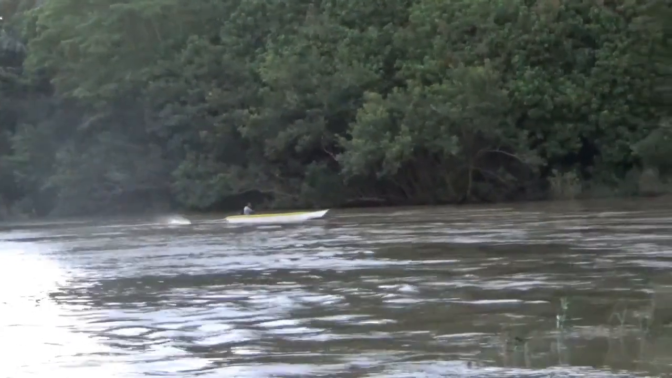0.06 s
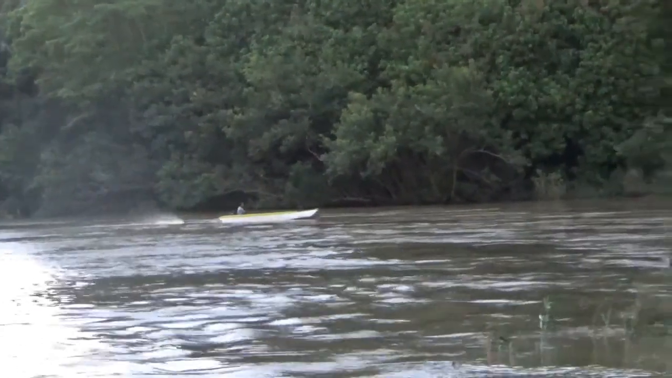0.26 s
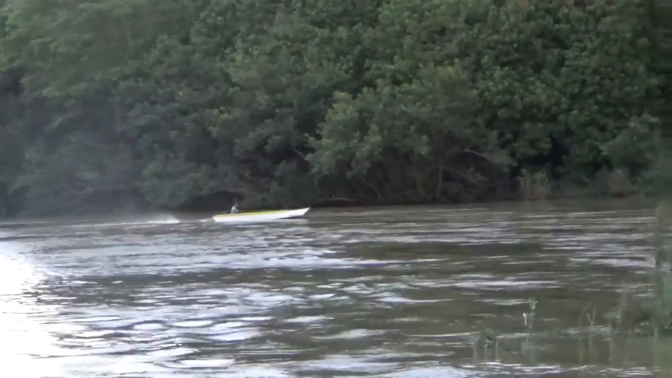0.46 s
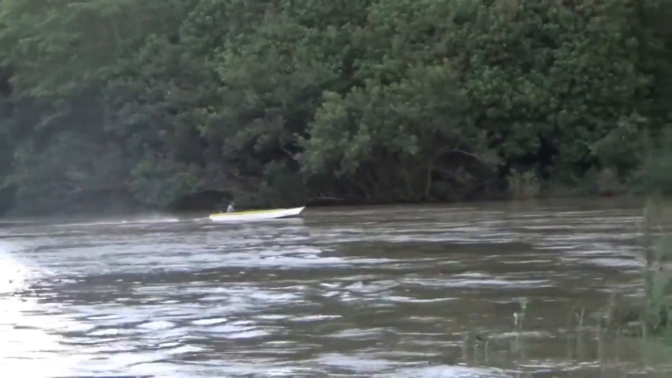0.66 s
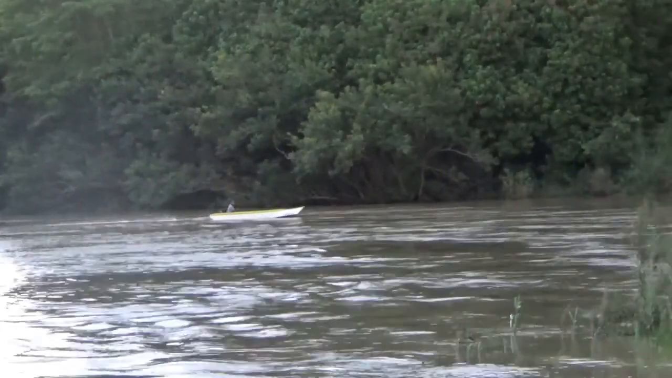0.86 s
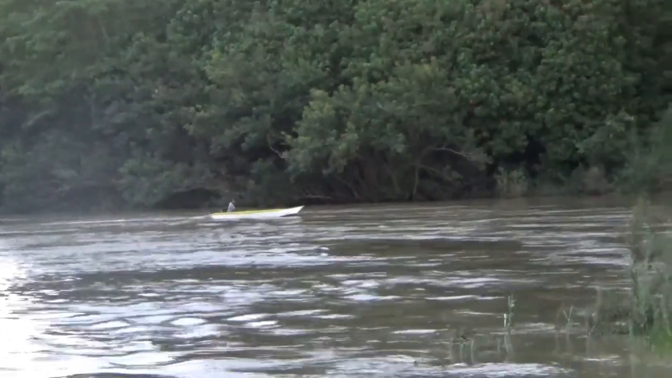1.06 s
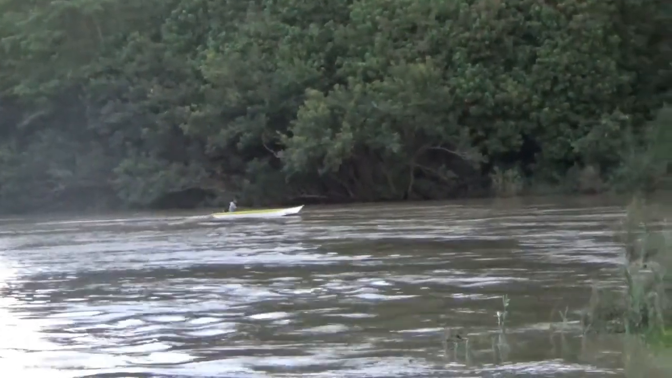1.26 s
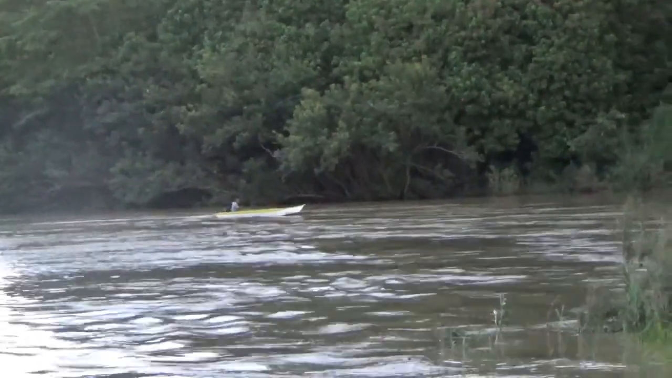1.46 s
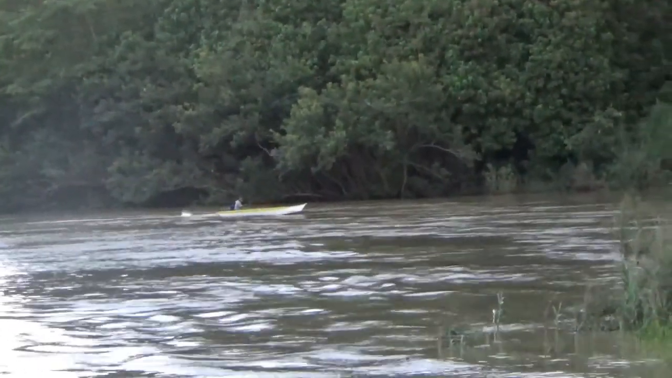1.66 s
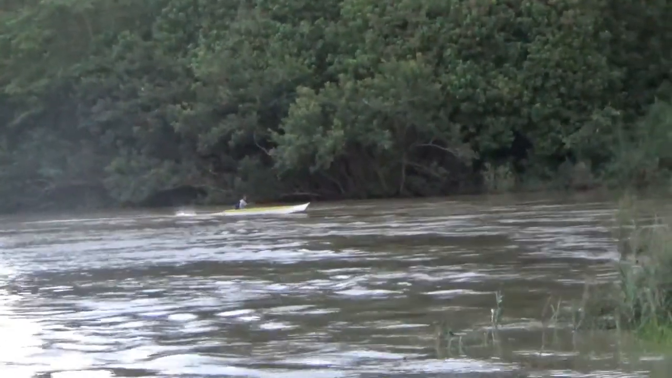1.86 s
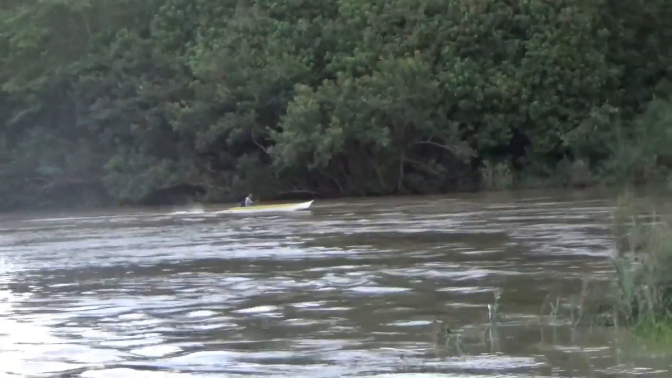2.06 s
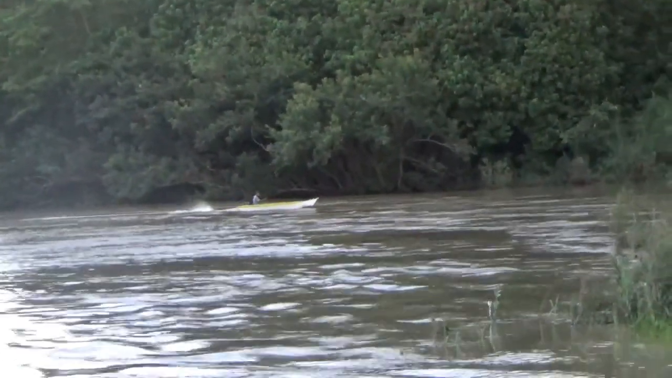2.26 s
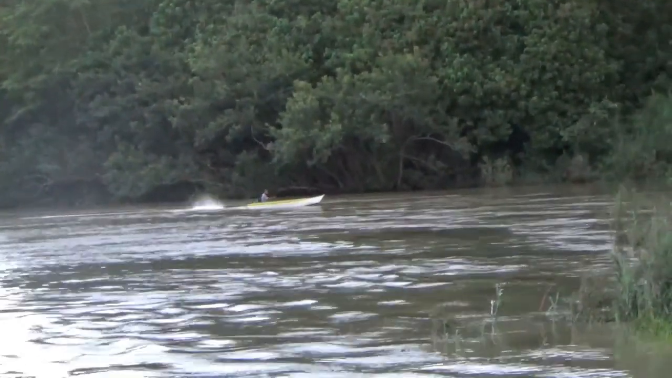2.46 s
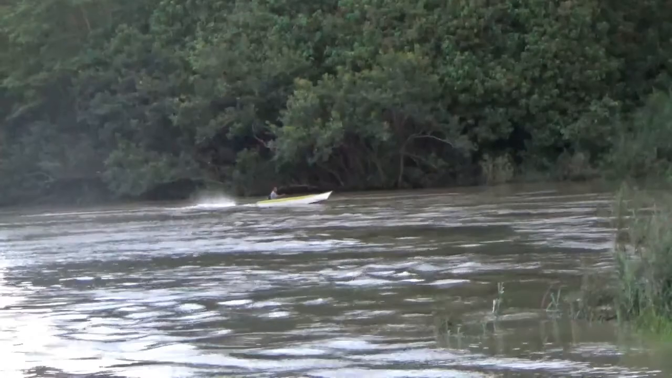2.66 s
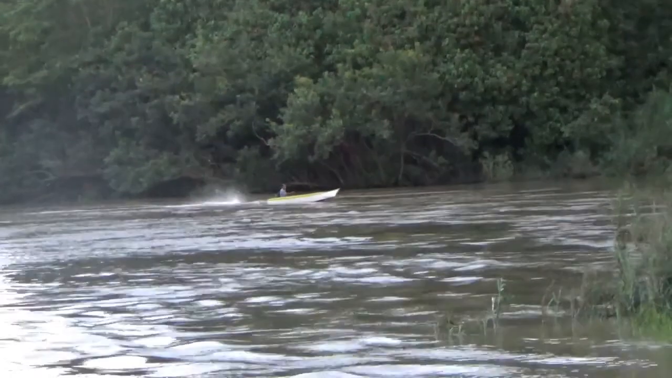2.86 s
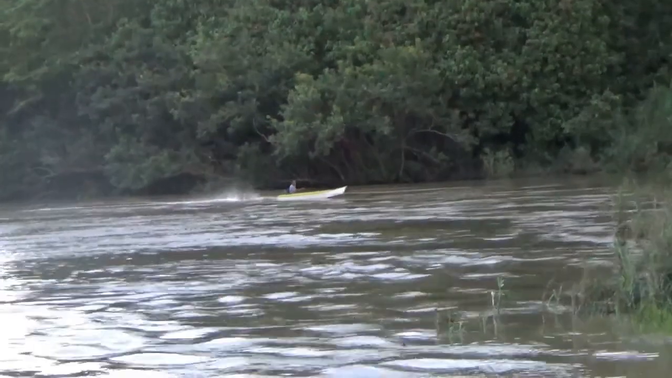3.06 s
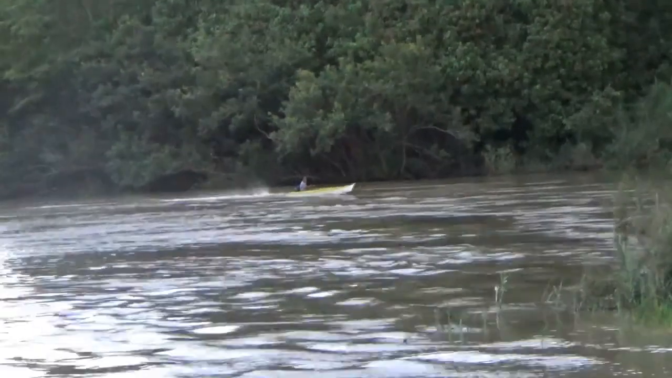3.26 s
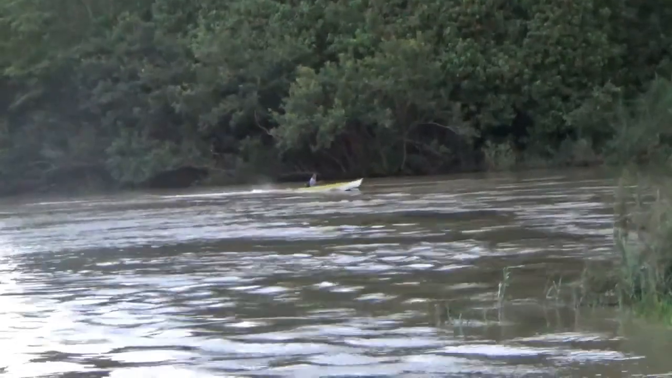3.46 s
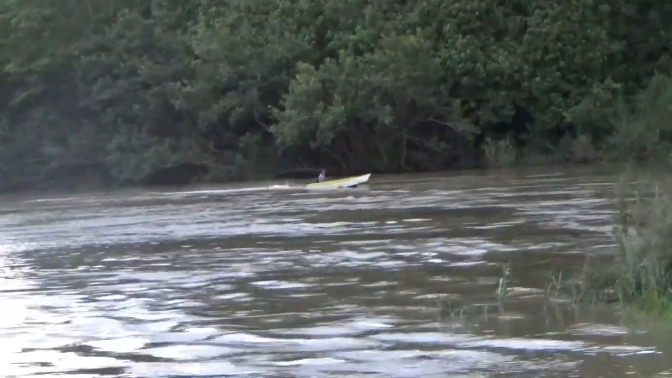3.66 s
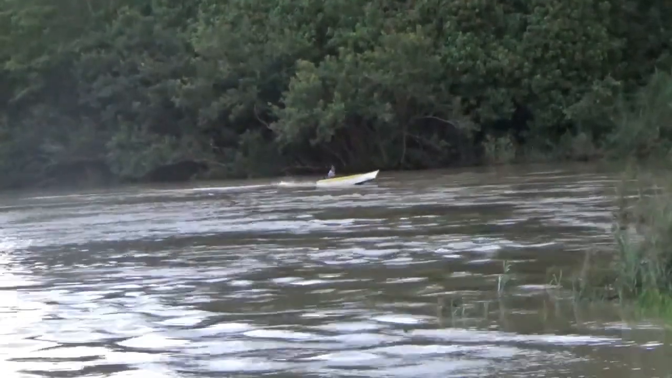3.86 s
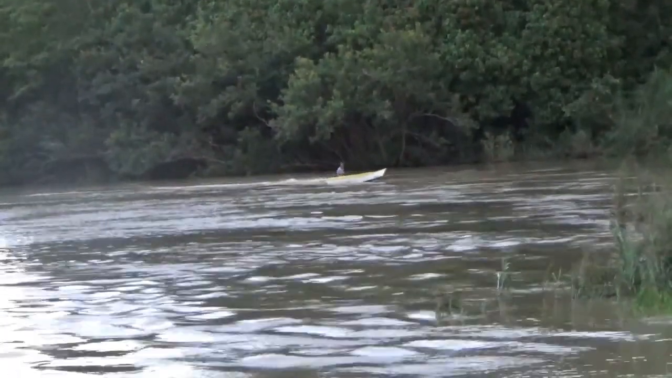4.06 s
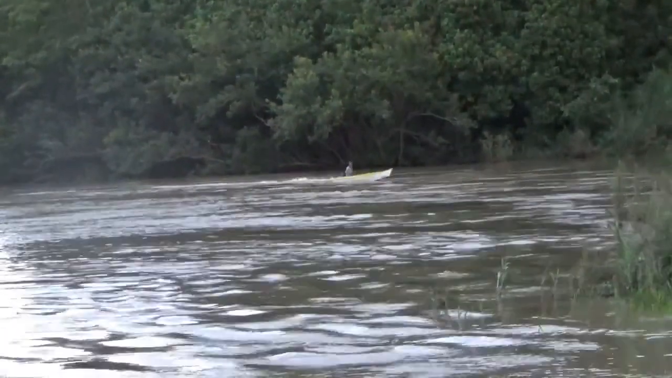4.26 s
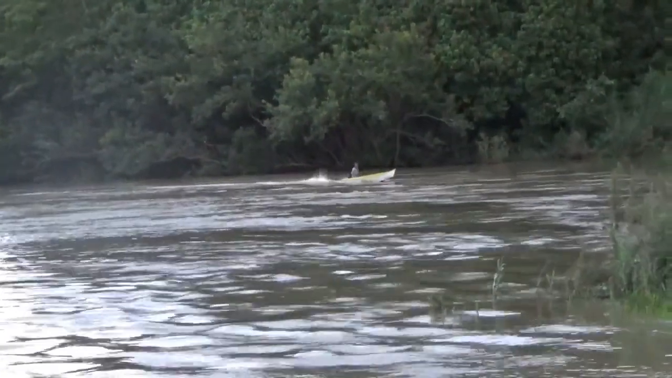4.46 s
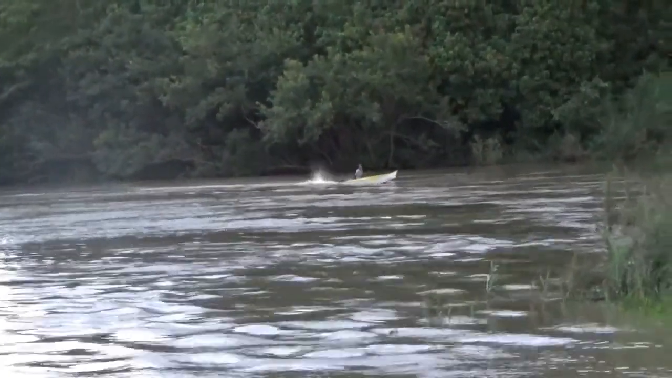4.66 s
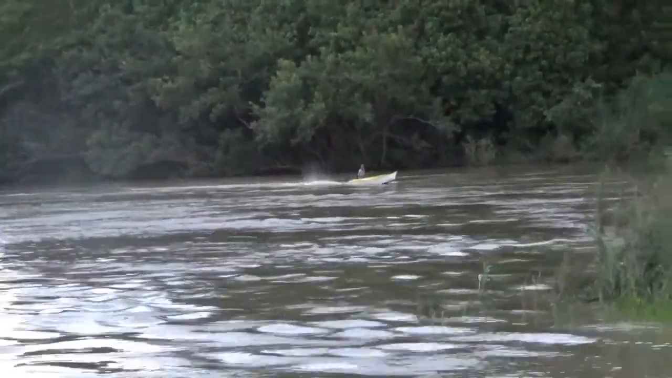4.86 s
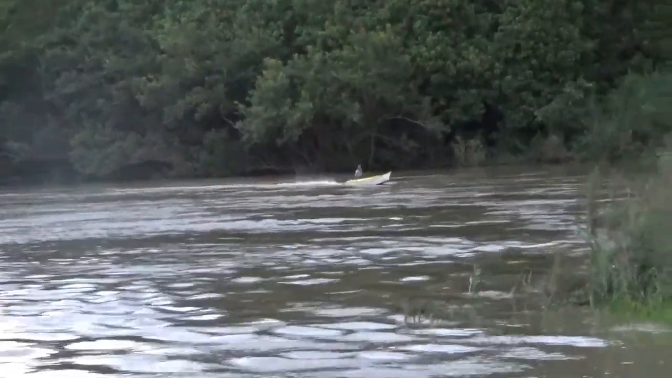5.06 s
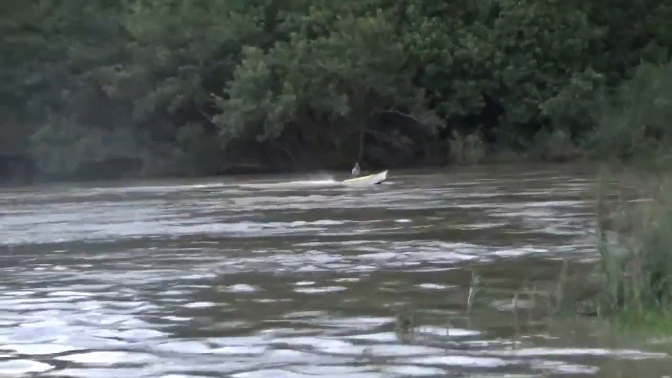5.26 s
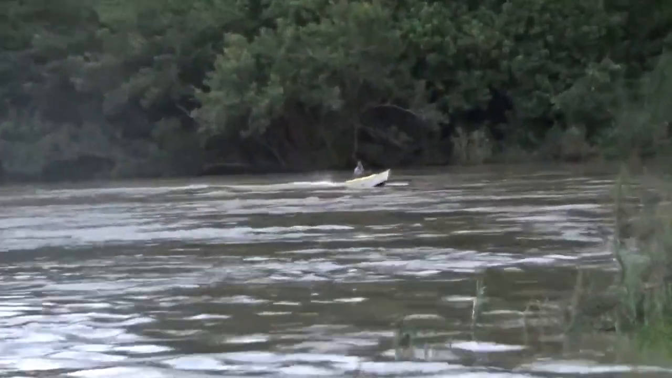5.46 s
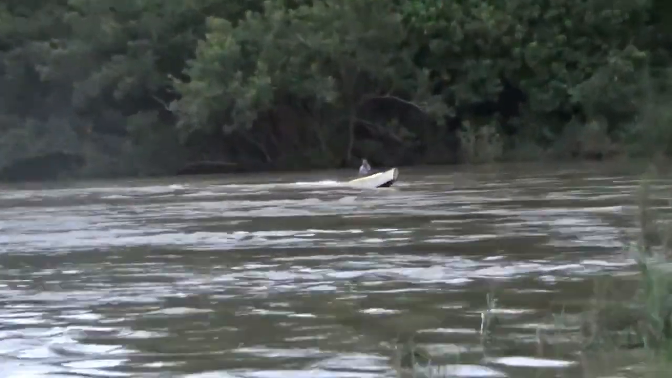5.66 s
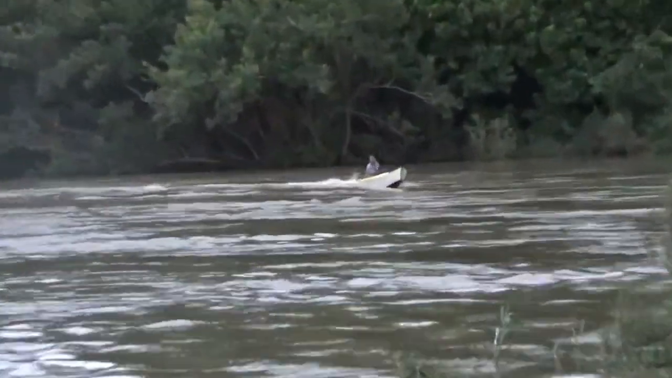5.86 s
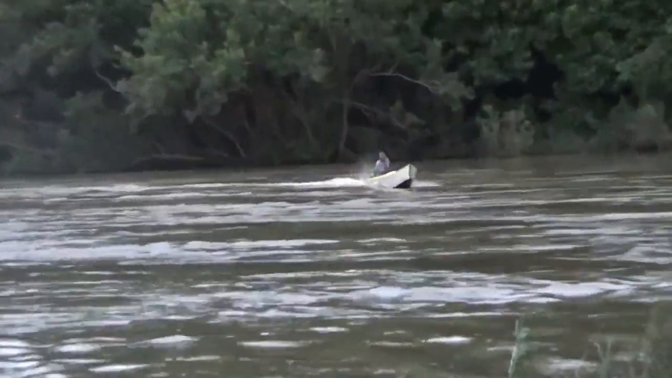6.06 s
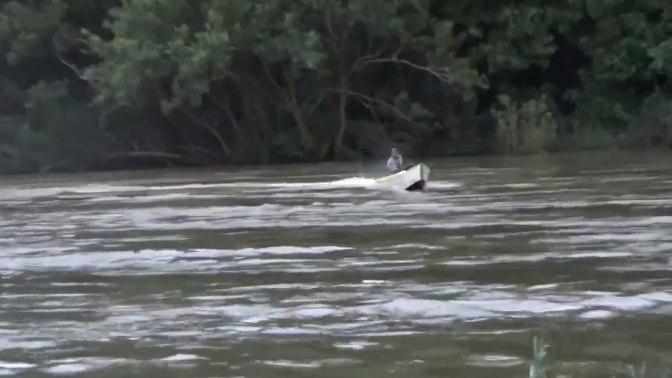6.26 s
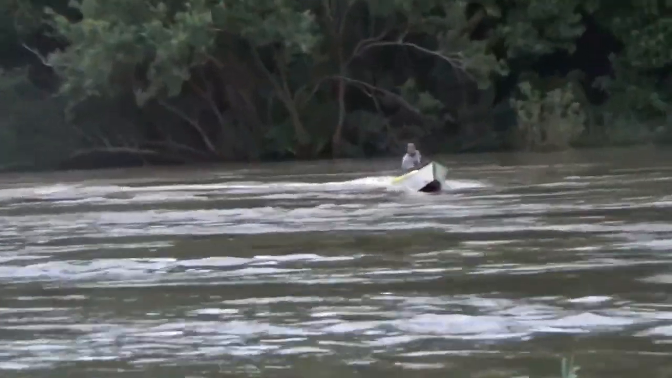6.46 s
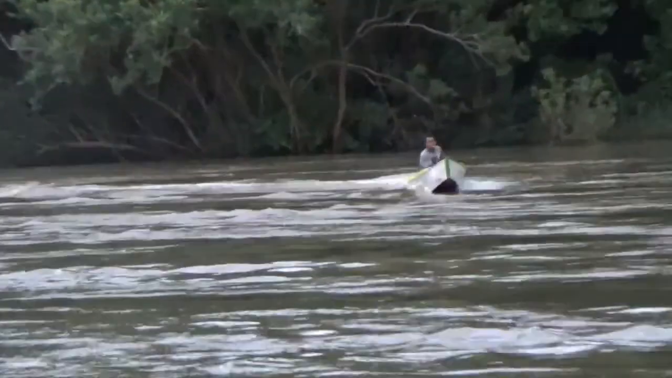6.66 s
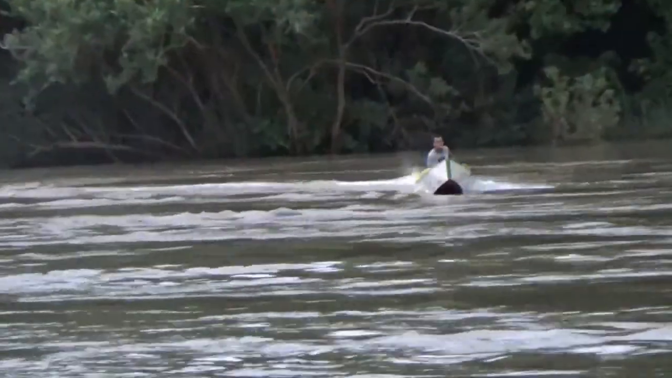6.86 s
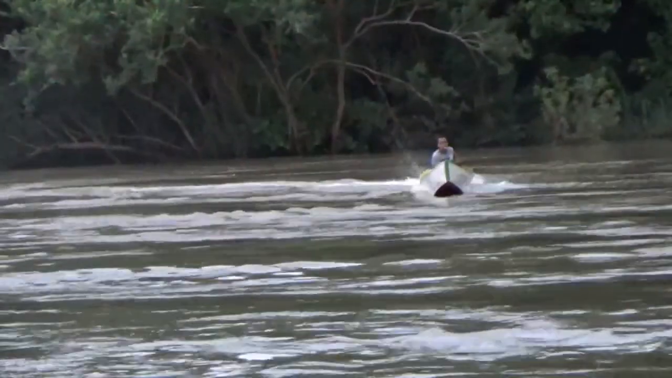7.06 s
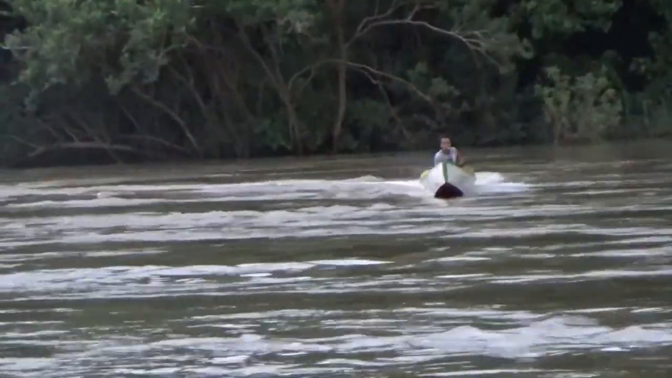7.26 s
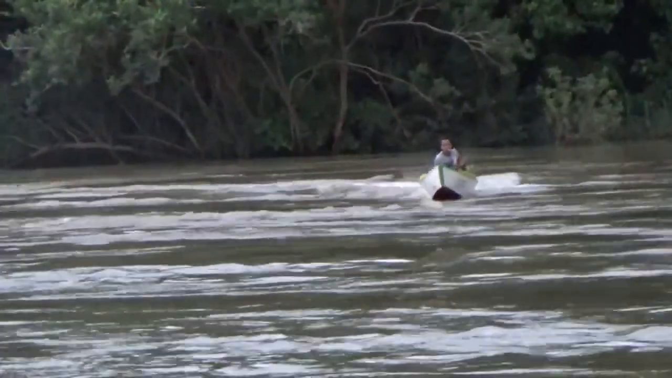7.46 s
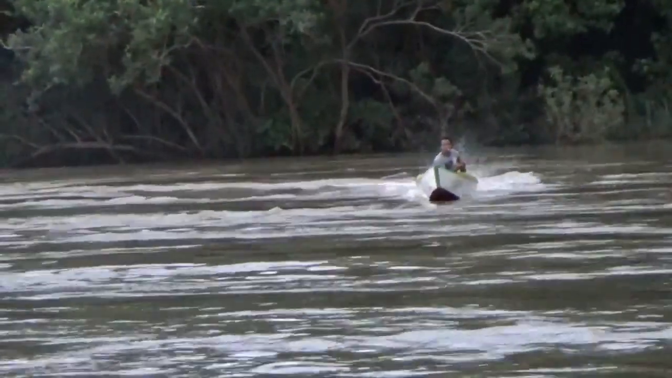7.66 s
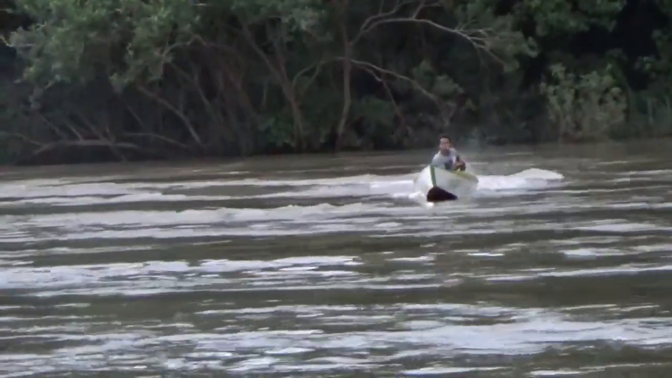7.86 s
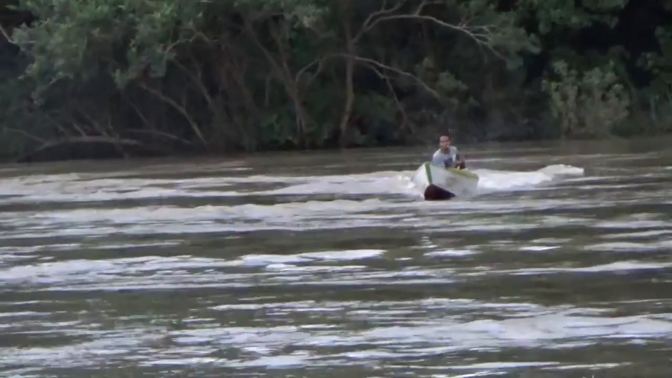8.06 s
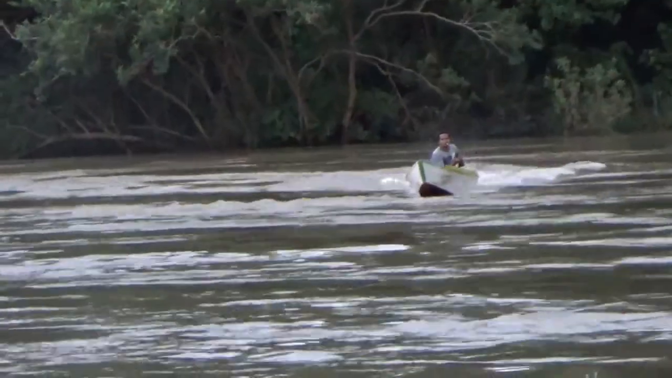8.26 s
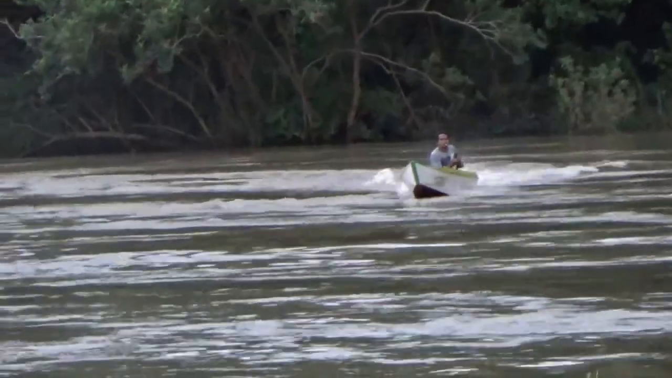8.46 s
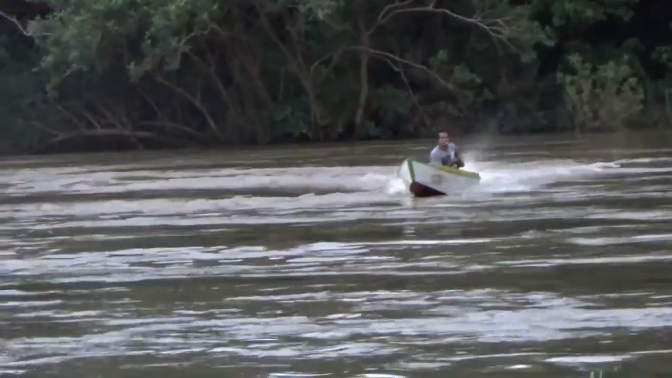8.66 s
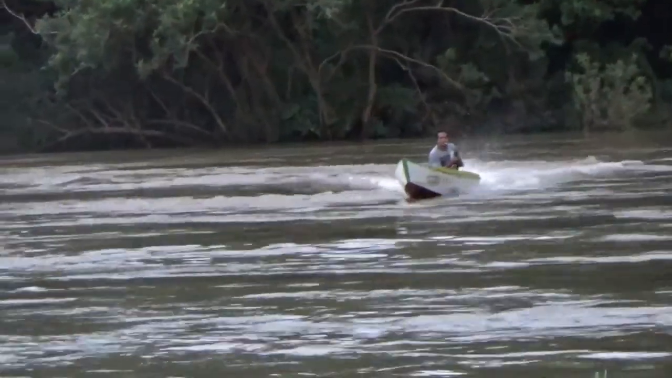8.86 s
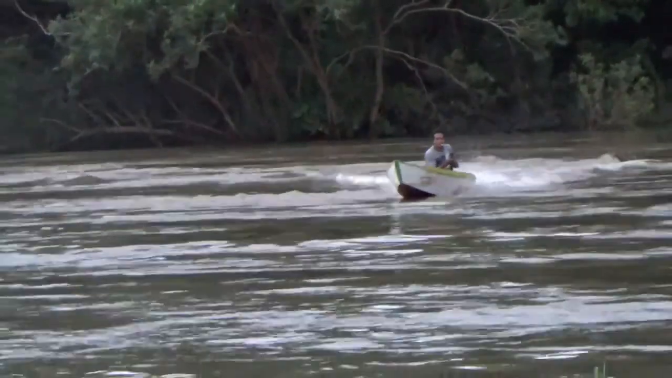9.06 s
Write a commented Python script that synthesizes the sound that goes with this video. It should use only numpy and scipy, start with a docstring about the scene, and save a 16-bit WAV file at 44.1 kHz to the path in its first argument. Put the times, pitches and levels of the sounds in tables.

```python
"""A river between wooded banks: a long narrow boat with a single-cylinder engine comes up it. The engine drops
to idle, picks up again, and the boat turns its bow to the listener. Each firing is a struck boom and pipe
resonances plus a turbulent jet; the hull hides this rasp bow-on. The trees scatter the firings as decaying
noise and a steep bank echoes them; the propeller hisses. Insects sing as trains of gliding tones, the current
is filtered noise, and a small splash comes late."""
import sys
import numpy as np
from scipy import signal
from scipy.fft import rfft, irfft, next_fast_len
from scipy.io import wavfile

SR = 44100
rng = np.random.default_rng(int(sys.argv[2]) if len(sys.argv) > 2 else 0)


def transcribe(signal):
    """Save signal, clipped to [-1, 1], as a 16-bit WAV file at the path in sys.argv[1]."""
    frames = np.atleast_2d(signal).T
    limited = np.clip(frames, -1, 1)
    pcm = np.round(limited * 32767).astype(np.int16)
    wavfile.write(sys.argv[1], SR, pcm)


N = 402191
TIME = np.arange(N) / SR
BINS = np.fft.rfftfreq(N, 1 / SR)

# Engine speed. Each row: time in seconds, firings per second.
ENGINE_SPEED = [(0.0, 26.78), (0.23, 27.69), (0.58, 14.11), (0.99, 10.31), (1.74, 10.11), (2.12, 20.68),
                (2.34, 23.95), (3.18, 26.69), (3.66, 26.26), (4.02, 24.05), (4.76, 26.93), (5.03, 29.68),
                (5.7, 31.11), (6.18, 30.96), (6.53, 31.96), (7.63, 32.37), (8.11, 31.92), (9.12, 32.5)]
# Course of the boat. Each row: time in seconds, heading from 0 (side-on) to 1 (bow-on).
COURSE = [(0, 0.031), (4.5, 0.014), (5.4, 0.13), (6.2, 0.43), (7.2, 0.87), (9.1, 0.86)]
# Throttle, shut for over a second, then opened and eased twice.
# Each row: time in seconds, opening from 0 (shut) to 1 (wide).
THROTTLE_OPENING = [(0.26, 0.89), (0.3, 0.39), (0.45, 0.054), (1.72, 0.041), (1.81, 0.73), (2.05, 0.95),
                    (2.5, 0.77), (3.68, 0.94), (3.87, 0.8), (5.0, 0.98)]
CRUISE_PER_S = 25.83  # firings per second at cruising speed


def gain_of(db):
    """The decibel: 20 dB is a tenfold amplitude."""
    return 10 ** (np.asarray(db) / 20)


def evened(x):
    """Normalisation of power: scales to an rms of 1."""
    return x / np.sqrt(np.mean(x ** 2) + 1e-20)


def at(curve, s):
    """Linear interpolation of a curve at time s."""
    times, values = np.transpose(curve)
    return np.interp(s, times, values)


def read(spectrum, hz):
    """Interpolation of a spectrum on a logarithmic frequency scale."""
    f, values = np.transpose(spectrum)
    return np.interp(np.log(hz + 1), np.log(f + 1), values)


def add(mix, s, sound):
    """Superposition: adds a sound to the mix at time s, clipped to its ends."""
    start = round(s * SR)
    sound = sound[max(-start, 0):]
    part = mix[max(start, 0):][:len(sound)]
    part += sound[:len(part)]


def coloured(x, db):
    """Linear filtering: multiplies the spectrum by a gain in dB given at BINS."""
    size = next_fast_len(N)
    gain = np.interp(np.fft.rfftfreq(size, 1 / SR), BINS, gain_of(db))
    return irfft(rfft(x, size) * gain, size)[..., :N]


def drift(per_s):
    """Slow random modulation with an rms of 1: chance values, per_s of them a second, joined by lines."""
    knots = rng.standard_normal(4000)
    return evened(np.interp(TIME * per_s, np.arange(len(knots)), knots))


def placed(x, pan_db):
    """Level-difference panning: the left ear is pan_db (fixed or a curve in time) louder than the right."""
    return x * gain_of(np.outer([.5, -.5], pan_db))


def spread(mid, side, width):
    """Mid-side stereo: a common part and a part of opposite sign in the two ears."""
    return np.array([mid + width * side, mid - width * side])


def diffuse(colour, width):
    """Diffuse field: coloured noise from all around, only partly alike in the two ears."""
    mid, side = coloured(rng.standard_normal((2, N)), read(colour, BINS))
    return evened(spread(mid, side, width))


def unit_pulse(wave):
    """Energy normalisation: an rms of 1 over the 8 ms that a firing lasts."""
    return wave / np.linalg.norm(wave) * np.sqrt(.008 * SR)


def ring(hz, width_hz, order):
    """Impulse response of a resonance: a band-pass filter struck once."""
    low = np.sqrt(hz ** 2 + width_hz ** 2 / 4) - width_hz / 2
    sections = signal.butter(order, [low, low + width_hz], "bandpass", fs=SR, output="sos")
    return unit_pulse(signal.sosfilt(sections, signal.unit_impulse(1024)))


def struck(colour):
    """Minimum phase: the causal pulse whose magnitude spectrum is given."""
    size = 8192
    db = read(colour, abs(np.fft.fftfreq(size, 1 / SR)))
    log_spectrum = np.conj(signal.hilbert(np.log(gain_of(db))))
    return unit_pulse(np.fft.ifft(np.exp(log_spectrum)).real[:1536])


def revs(s):
    """Engine speed on a logarithmic scale: octaves above cruising speed."""
    return np.log2(at(ENGINE_SPEED, s) / CRUISE_PER_S)


def blow(s):
    """Source strength from throttle, speed and course: boom dB, then bark, after-ring and rasp relative to it."""
    # Ringing after the boom. Each row: time in seconds, level in dB relative to the boom.
    after_ring = [(0, -9), (0.45, -3), (2.0, -14), (4.4, -22), (4.85, -3.5), (6.2, -7.5), (7.1, -2.5),
                  (7.85, -20), (8.9, -1.5)]
    shut = 1 - at(THROTTLE_OPENING, s)
    heading = at(COURSE, s)
    boom = -21 + 4 * revs(s) - 11.5 * shut  # speed gives 4 dB per octave
    boom += 0.71 * max(s - 5.03, 0)  # dB per second: louder once the boat turns to the listener
    bark = -0.6 - 5.5 * shut - 7 * np.sin(np.pi * heading)  # weakest halfway through the turn
    rough = -2.5 - 5 * shut - 10 * heading
    return boom, bark, at(after_ring, s), rough


def firings():
    """Integrated frequency: the exhaust valve opens whenever the engine's phase passes a whole cycle."""
    cycles = np.cumsum(at(ENGINE_SPEED, TIME)) / SR - .03
    return (np.flatnonzero(np.diff(np.floor(cycles)) > 0) + 1) / SR


def exhaust(times, boom_db=-3.0, repeat_db=-12, bark_db=-4.0, after_db=-3, crack_db=-10):
    """Impulsive excitation: each firing booms, barks and cracks in the pipe; a ringing reflection follows.

    The levels in dB are added to those of blow(); repeat_db is relative to the first boom."""
    # Low boom of one firing seen side-on, bow-on and at idle. Each row: frequency in Hz, level in dB.
    boom_side = [(15, -51), (44, -19), (64, -9.5), (100, -3), (155, -2), (205, 0.5), (255, -1), (320, -8),
                 (390, -15), (470, -23.5), (1200, -42.5)]
    boom_bow = [(15, -48), (44, -31), (64, -15), (100, -10), (160, -8.5), (220, -1.5), (295, -1),
                (350, -9.5), (410, -26), (1200, -57)]
    boom_idle = [(15, -31), (60, -4), (120, -1.5), (175, 4.5), (260, -9), (355, -2), (470, -23.5),
                 (1200, -37)]
    side, bow, idling = struck(boom_side), struck(boom_bow), struck(boom_idle)
    out = np.zeros(N)
    for s, chance in zip(times, rng.standard_normal((len(times), 5))):
        level, bark, after, rough = blow(s)
        heading = at(COURSE, s)
        rate = at(ENGINE_SPEED, s)
        uneven_db = 0.2 + 2 * (1 - at(THROTTLE_OPENING, s)) ** 2  # uneven with the throttle shut
        level = level + uneven_db * chance[0]

        idle = np.clip((16 - rate) / 5, 0, 1)
        cruising = (1 - heading) * side + heading * bow
        boom = (1 - idle) * cruising + idle * idling
        onset = s - .0006 + 0.0019 * (1 - heading)  # side-on the boom lags the crack
        add(out, onset, gain_of(level + boom_db) * boom)
        # a weaker copy of the boom follows shortly after
        add(out, onset + 0.00547, gain_of(level + boom_db + repeat_db) * boom)

        barking = ring(hz=700 - 25 * heading + 4 * chance[2], width_hz=215 + 110 * heading, order=2)
        add(out, s - .0001, -gain_of(level + bark + bark_db + 0.34 * chance[1]) * barking)

        crack = ring(hz=1760 - 90 * heading + 80 * chance[3], width_hz=420, order=3)
        cracking_db = level + rough + crack_db - 4.9 * idle - 1.8 * heading + 1.5 * chance[4]
        add(out, s, gain_of(cracking_db) * crack)

        # a ringing reflection follows after a fixed share of the cycle, or a fixed time below 24 firings/s
        lag = .211 / max(rate, 24)
        add(out, s + lag, gain_of(level + after + after_db) * ring(hz=678, width_hz=277, order=3))
    return out


def rasp(times, rasp_db=-2, uneven_db=1.5, flicker_db=2.97):
    """Turbulent jet noise: a puff at each firing, bright side-on and dull once the hull hides the pipe."""
    # Colour of the jet side-on and bow-on. Each row: frequency in Hz, relative level in dB per Hz.
    rasp_side = [(80, -4), (250, -10), (450, -2), (720, 5), (930, -3), (1130, 3.5), (1350, -8), (1600, 1.5),
                 (2200, -11), (3700, -12), (6000, -11), (9000, -12), (11000, -18.5)]
    rasp_bow = [(80, -5), (250, 7.5), (420, -0.5), (750, 6), (950, -7.5), (1150, -1), (1370, -10.5),
                (1600, -5.5), (2000, -2.5), (2400, -13.5), (3700, -23.5), (6000, -32), (11000, -24.5)]
    # Upper resonances of the exhaust pipe. Each row: frequency in Hz, width in Hz, boost in dB.
    pipe_modes = [(1895, 410, 9.5), (2586, 330, 13), (3310, 354, 12.5), (4100, 210, 7)]
    rise, idle_rise, hold, fade = 0.00026, .004, 0.005, 0.0078  # seconds
    t = np.arange(1536) / SR
    body = 1 / (1 + (t / hold) ** 6) + np.exp(-t / fade)
    flow = np.zeros(N)
    for s, chance in zip(times, rng.standard_normal(len(times))):
        level, _, _, rough = blow(s)
        weak = np.clip((-22 - level) / 6, 0, 1)  # weak firings swell slowly into soft puffs
        puff = (1 - np.exp(-t / (rise + idle_rise * weak))) * body
        puff *= np.sqrt(.006 * SR) / np.linalg.norm(puff)
        add(flow, s, gain_of(level + rough + rasp_db + uneven_db * chance) * puff)
    jet = flow * rng.standard_normal(N)

    pipe_db = sum(db * np.exp(-2 * ((BINS - hz) / width) ** 2) for hz, width, db in pipe_modes)
    side = coloured(jet, read(rasp_side, BINS) + pipe_db + 10.0)
    bow = coloured(jet, read(rasp_bow, BINS) + 14)
    heading = at(COURSE, TIME)
    out = (1 - heading) * side + heading * bow
    # the treble flickers
    treble = coloured(out, read([(1500, -68), (3500, -4.0)], BINS))
    return out + treble * (gain_of(flicker_db * drift(22)) - 1)


def woods(x, width=0.42, recede=.018, count=4):
    """Reverberant scatter and Doppler shift: decaying noise tails from stands of trees the boat leaves behind.

    It leaves each stand at its own speed, so each answers flat by its own part of the share recede."""
    # Reverberation of the wooded banks. Each row: frequency in Hz, 60 dB decay time in seconds, level in dB.
    banks = np.array([(60.4, 0.71, -7), (171, 0.81, -15), (316, 0.68, -5.5), (427, 0.85, 3.5),
                      (480, 2.2, -1.5), (700, 1.1, -6.5), (1730, 1.15, -5.5), (3760, 1.4, -8.5),
                      (9900, 1.5, -3.5)])
    taps = rng.standard_normal((count, 2, SR)) * np.clip((TIME[:SR] - .004) / 0.0035, 0, 1)
    hz, t, z = signal.stft(taps, SR, nperseg=512)
    t60 = read(banks[:, [0, 1]], hz)[:, None]
    db = read(banks[:, [0, 2]], hz)[:, None]
    # the root makes a tail's energy independent of its decay time
    z = z * gain_of(db - 60 * t / t60) * np.sqrt(2 * np.log(1000) / (t60 * SR * count))
    tails = signal.istft(z, SR, nperseg=512)[1]
    scattered = np.zeros((2, N))
    for k, tail in enumerate(tails):
        feed = np.interp(TIME * (1 - recede * (k + .5) / count), TIME, x)
        scattered += signal.fftconvolve(feed[None], tail, axes=1)[:, :N]
    return spread(*scattered, width)


def bank_echo(x, level_db=-17, delay=.352):
    """Specular reflection: one echo from the steep bank, its delay in seconds growing by 4 ms a second."""
    return gain_of(level_db) * np.interp(TIME - delay - .004 * TIME, TIME, x, left=0)


def spray():
    """Broadband flow noise: the propeller's spray hisses louder with engine speed."""
    # Colour of the spray. Each row: frequency in Hz, relative level in dB per Hz.
    spray_colour = [(300, 3), (1200, 8.5), (2500, 3.5), (4500, 2.5), (6500, 1.5), (9000, -4.5),
                    (11000, -15)]
    level_db = -38.5 + 7 * revs(TIME) + 0.92 * drift(15)  # 7 dB per octave of speed
    return diffuse(spray_colour, width=0.6) * gain_of(level_db)


def boat(astern_db=4, bow_pan_db=1):
    """Direct and reflected paths: engine, woods, bank echo and spray add up."""
    times = firings()
    pulses, jet = exhaust(times), rasp(times)
    heading = at(COURSE, TIME)
    outward = pulses + jet * gain_of(astern_db * heading)  # bow-on, the pipe points at the trees
    direct = placed(pulses, pan_db=1.35) + placed(jet, pan_db=0.7)
    direct = placed(direct, bow_pan_db * heading)  # leans further left as the bow comes round
    return direct + placed(woods(outward), pan_db=1.2) + bank_echo(outward) + spray()


def chirp(hz, length, glide):
    """Frequency modulation: one wing stroke, a gliding tone that swells and fades; glide is a share of hz."""
    u = np.linspace(0, 1, int(length * SR))
    phase = 2 * np.pi * np.cumsum(hz * (1 + glide * (u - .5))) / SR
    return np.sin(np.pi * u) * np.sin(phase)


def insect(hz, per_s, length, glide, uneven_db, jitter):
    """Stridulation: a train of wing strokes, no two quite alike; jitter is a share of their spacing."""
    out = np.zeros(N)
    chance = rng.standard_normal((600, 3))
    starts = np.cumsum(1 + jitter * chance[:, 0]) / per_s - .1
    for s, (_, size, pitch) in zip(starts, chance):
        if s < TIME[-1]:
            add(out, s, gain_of(uneven_db * size) * chirp(hz * (1 + .003 * pitch), length, glide))
    return evened(out)


def katydid(level_db=-40):
    """Rapid stridulation: fast, rising wing strokes."""
    song = insect(hz=7923, per_s=49.2, length=0.0124, glide=0.048, uneven_db=3.0, jitter=0.12)
    return placed(gain_of(level_db) * song, pan_db=4.5)


def crickets():
    """Slower stridulation: two singers with slightly falling chirps."""
    # Each row: pitch in Hz, chirps per second, chirp length in seconds, glide as a share of the pitch,
    # level in dB, left-over-right level in dB.
    singers = [(7570, 13, 0.039, -0.00094, -44, -3), (7130, 11.1, 0.038, -0.0227, -48, -3)]
    out = np.zeros((2, N))
    for hz, per_s, length, glide, db, pan_db in singers:
        song = insect(hz, per_s, length, glide, uneven_db=2.5, jitter=0.032)
        out += placed(gain_of(db) * song, pan_db)
    return out


def far_chorus(level_db=-40):
    """Incoherent superposition: a far chorus of insects, drawn as a band of noise."""
    # Colour of the chorus. Each row: frequency in Hz, relative level in dB per Hz.
    chorus_colour = [(5000, -50), (6500, -14), (7100, -7), (7500, 0.5), (8000, -9.5), (8250, -7.5),
                     (8800, -21), (10000, -70)]
    return gain_of(level_db) * diffuse(chorus_colour, width=0.4)


def distant_buzzes():
    """Tone and resonant noise: lower buzzes of distant insects, half gliding tone and half scrape."""
    # Each row: start in seconds, length in seconds, pitch in Hz, level in dB.
    buzz_rows = [(0.173, 0.22, 4470, -49), (0.728, 0.3, 4410, -50), (1.196, 0.27, 4700, -58),
                 (1.488, 0.29, 4570, -56.5), (2.053, 0.41, 4660, -54), (2.907, 0.27, 4750, -51),
                 (5.817, 0.43, 4368, -51), (6.609, 0.2245, 4450, -50), (7.137, 0.26, 4400, -49.5),
                 (7.76, .22, 4420, -52), (8.26, 0.33, 4523, -50)]
    out = np.zeros(N)
    for s, length, hz, db in buzz_rows:
        scrape = rng.standard_normal(SR)[:int(length * SR)]
        scrape = signal.fftconvolve(scrape, ring(hz, width_hz=200, order=2))[:len(scrape)]
        tone = chirp(hz, length, glide=-0.0068)
        buzz = evened(evened(tone) + evened(scrape))
        add(out, s, gain_of(db) * buzz * signal.windows.tukey(len(buzz), .45))
    return out


def river(level_db=-48):
    """Flow noise: the soft wash of the current, slowly wavering in level."""
    # Colour of the wash. Each row: frequency in Hz, relative level in dB per Hz.
    wash_colour = [(20, -21), (60, 1.5), (180, 6), (350, 1), (480, -6.5), (690, 6), (900, -11.5),
                   (1750, -5.5), (2300, -32), (5600, -35), (6600, -43), (8600, -57), (9250, -2),
                   (10500, -5.5)]
    return diffuse(wash_colour, width=0.17) * gain_of(level_db + 3.9 * drift(7.5))


def splash(s=9.044, length=0.0089, level_db=-33):
    """Splash noise: one small splash close by, a Gaussian burst around time s."""
    colour_db = read([(500, -21), (1500, -3), (4500, -6), (7000, -17)], BINS)
    noise = evened(coloured(rng.standard_normal(N), colour_db))
    return gain_of(level_db) * noise * np.exp(-((TIME - s) / length) ** 2)


def scene():
    """Superposition of boat, insects, river and splash."""
    insects = katydid() + crickets() + far_chorus() + distant_buzzes()
    return boat() + insects + river() + splash()


def record(dry, low_hz=42, edge_hz=11100):
    """Band limitation: the microphone's bass roll-off and a steep upper edge."""
    dry = dry * signal.windows.tukey(N, .0004)  # brief fades at both ends
    dry = signal.lfilter(*signal.butter(2, low_hz, "highpass", fs=SR), dry)
    low_pass = signal.firwin(601, edge_hz, window=("kaiser", 9), fs=SR)
    return signal.oaconvolve(dry, low_pass[None], "same")


dry = scene()
out = record(dry)
transcribe(out)
```